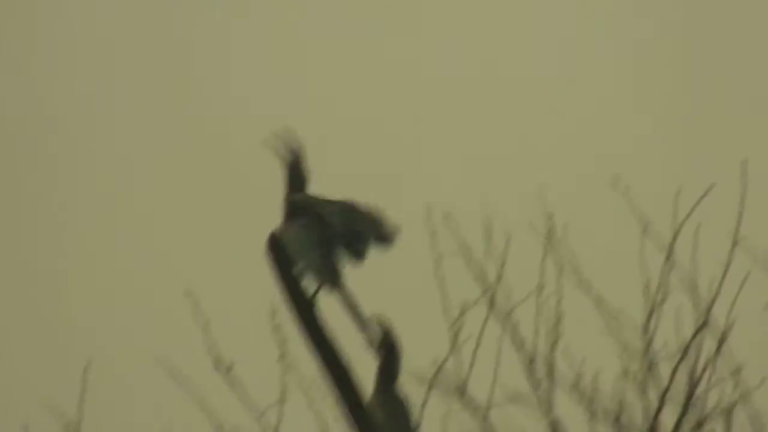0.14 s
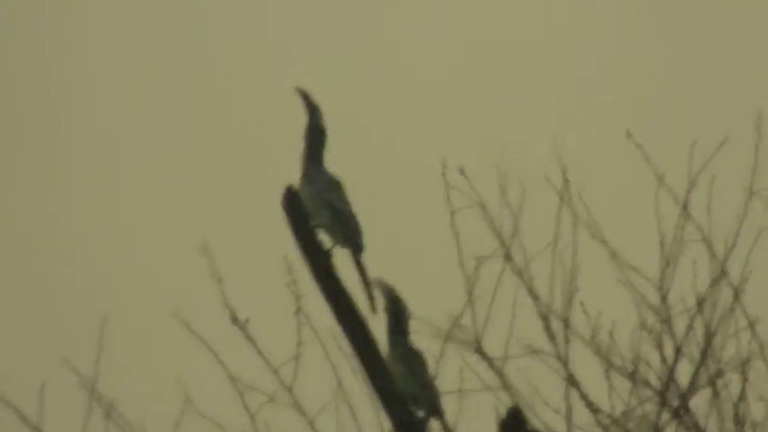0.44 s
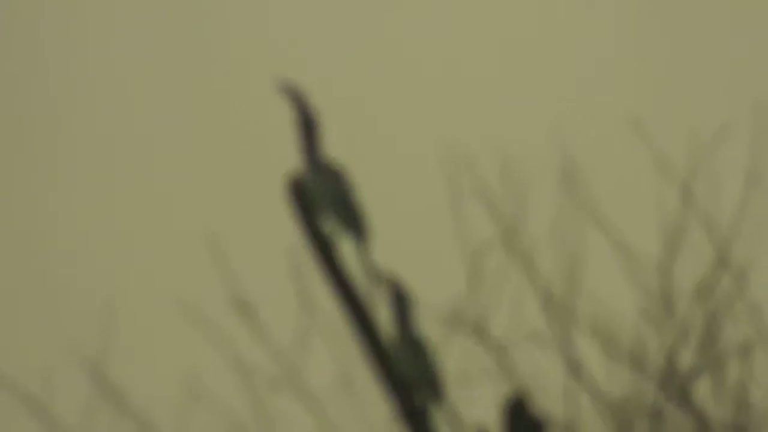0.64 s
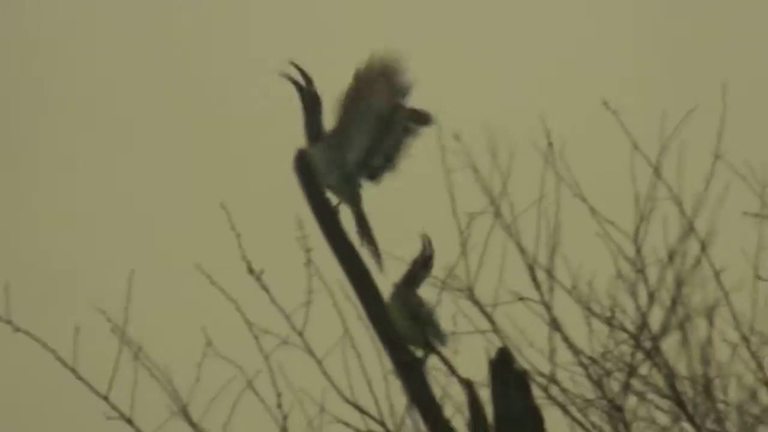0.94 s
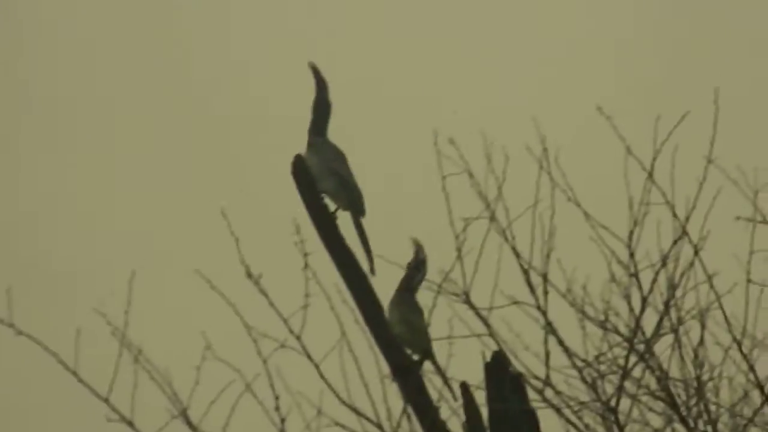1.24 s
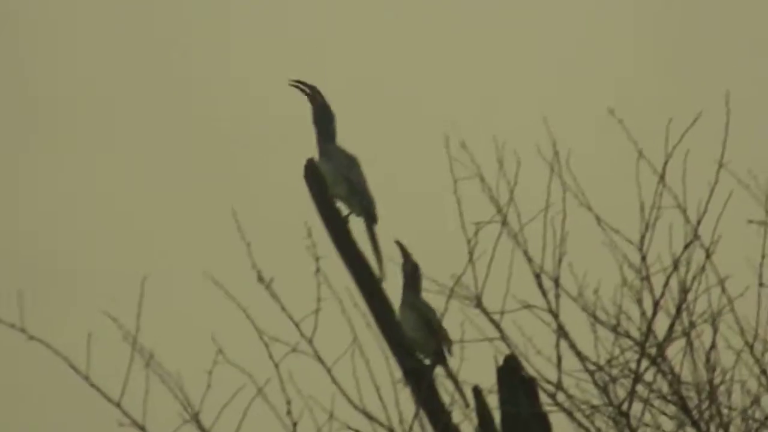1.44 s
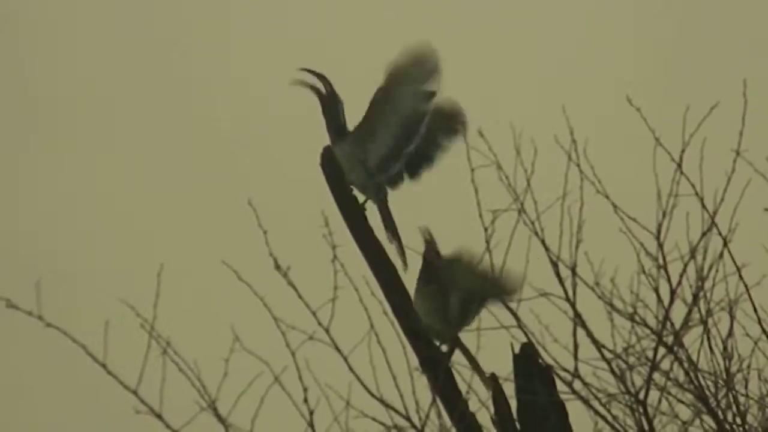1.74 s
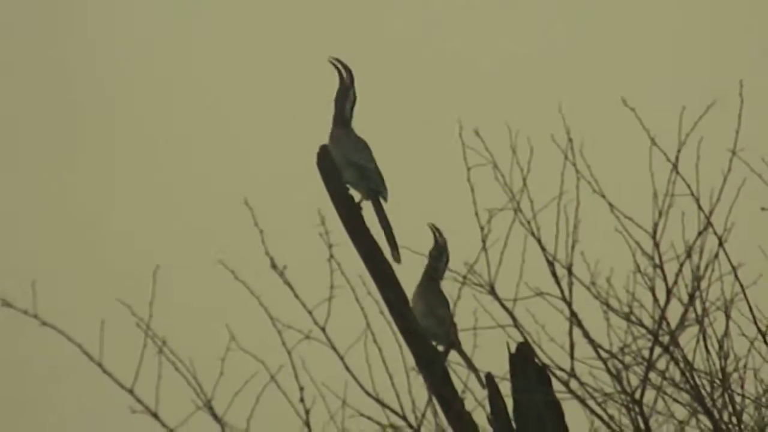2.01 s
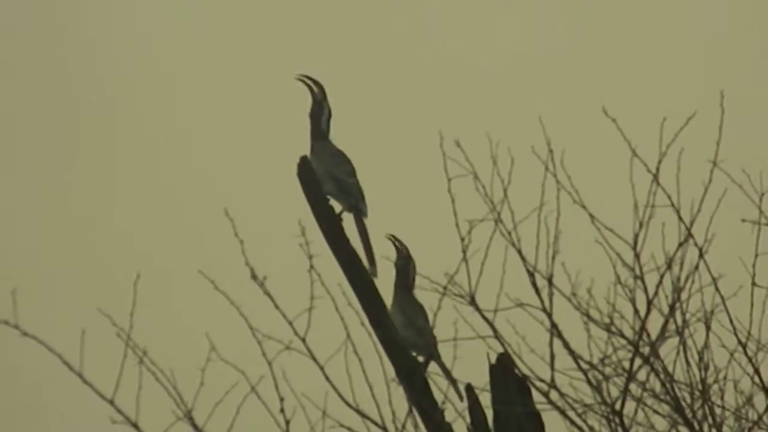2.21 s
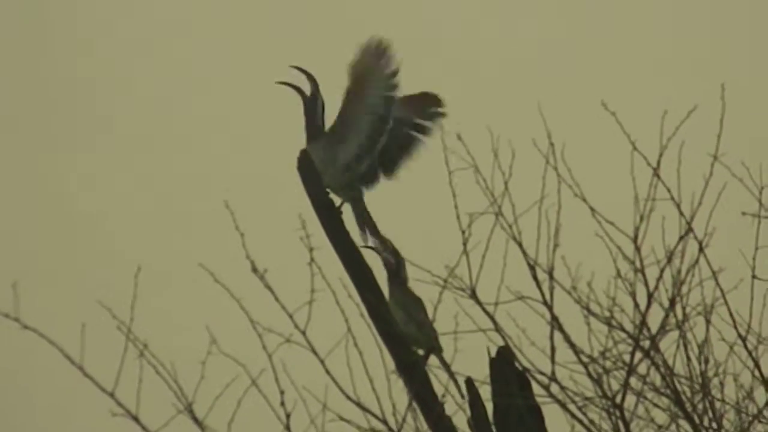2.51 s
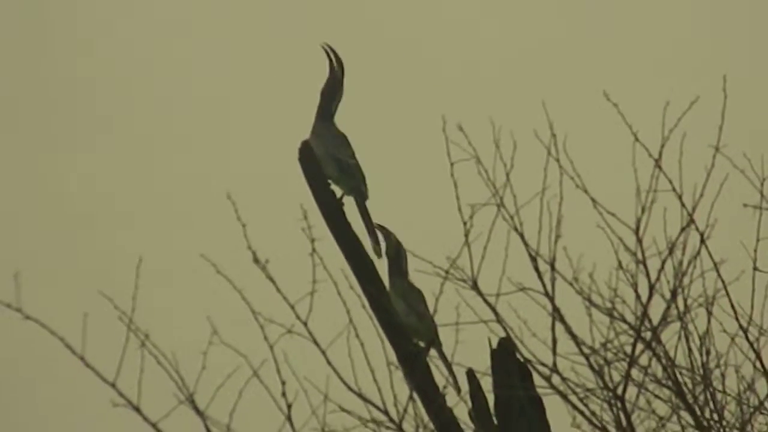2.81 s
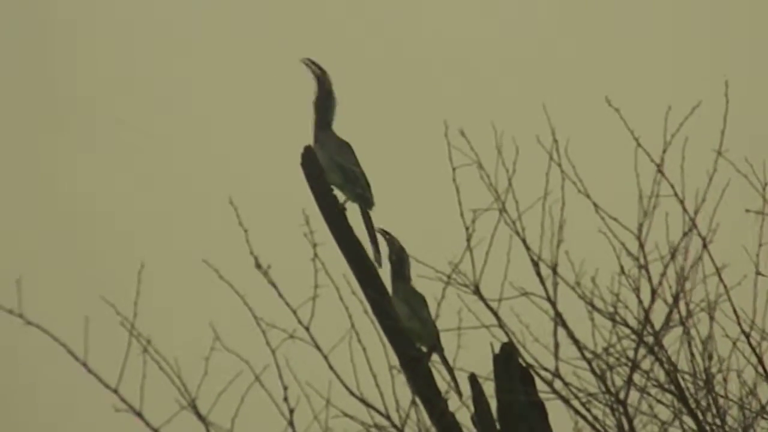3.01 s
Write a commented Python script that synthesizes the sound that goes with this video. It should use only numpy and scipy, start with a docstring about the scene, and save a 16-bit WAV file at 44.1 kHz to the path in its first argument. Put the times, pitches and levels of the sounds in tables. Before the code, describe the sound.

Hornbills pipe shrill, overlapping, drooping whistles from 0 to 3 s, in closely spaced bursts with light outdoor echoes. A raspy, chopped warble runs through the first 0.5 s, and higher small-bird peeps and tiny squeaks recur. Fingers rustle and tick on the camera until about 1.3 s. Low wind thumps touch the microphone near 1.2 s, then strengthen from 1.9 s over faint, distant hush.

```python
"""Hornbill whistles in gusting wind

Hornbills pipe overlapping whistles that glide and droop, smaller birds whistle higher, and one bird
rasps a short warble: all are harmonic tones with echoes. Fingers rustle and tick on the camera early on
(coloured noise, knocked resonances); wind thumps ever harder on the microphone over a far outdoor hush."""
import sys
import numpy as np
from scipy import signal
from scipy.fft import rfft, irfft, next_fast_len
from scipy.io import wavfile
from scipy.ndimage import uniform_filter1d, map_coordinates

SR = 44100
rng = np.random.default_rng(int(sys.argv[2]) if len(sys.argv) > 2 else 0)


def to_wav(sig):
    """Store sig (one row per channel, or 1-D mono) as 16-bit WAV at the path in sys.argv[1].

    Samples outside -1..1 are clipped; the rate is SR.
    """
    pcm = np.clip(np.atleast_2d(sig), -1, 1) * 32767
    pcm = np.round(pcm).astype(np.int16)
    wavfile.write(sys.argv[1], SR, pcm.T)  # frames by channels


N = 138915
ATTACK_S, RELEASE_S = 0.0069, 0.0069  # whistles and blends


def amp(db):
    """dB to amplitude ratio."""
    return 10 ** (np.asarray(db) / 20)


def unit(x):
    """Scales x to rms 1."""
    return x / np.sqrt(np.mean(x ** 2) + 1e-20)


def curve(rows):
    """Interpolates (time [s], level [dB]) to every sample, -120 dB after the last row."""
    s, v = np.transpose(rows)
    return np.interp(np.arange(N) / SR, s, v, right=-120)


def wobble(rate_hz):
    """A smooth random curve with rate_hz knots a second."""
    knots = rng.standard_normal(int(N * rate_hz / SR) + 4)
    return map_coordinates(knots, [np.arange(N) * rate_hz / SR])


def filtered(x, response):
    """Multiplies the spectrum of x by a response of frequency."""
    m = next_fast_len(N + SR // 2)
    return irfft(rfft(x, m) * response(np.fft.rfftfreq(m, 1 / SR)), m)[..., :N]


def rush(spectrum, patchy_db):
    """Coloured noise of rms 1 whose gain varies in random time-frequency patches."""
    z = signal.stft(rng.standard_normal(N), nperseg=512)[2]
    field = uniform_filter1d(rng.standard_normal(z.shape), size=6, axis=0)
    field = uniform_filter1d(field, size=8, axis=1)
    x = signal.istft(z * amp(patchy_db * unit(field)), nperseg=512)[1][:N]
    f, v = np.transpose(spectrum)
    return unit(filtered(x, lambda hz: amp(np.interp(np.log(hz + 1), np.log(f + 1), v))))


def add(out, s, x):
    """Mixes x into out from time s."""
    part = out[max(round(s * SR), 0):][:len(x)]
    part += x[:len(part)]


def edges(t, length, rise, fall):
    """Sine-squared attack and release."""
    return np.sin(np.pi / 2 * np.clip(np.minimum(t / rise, (length - t) / fall), 0, 1)) ** 2


def stretch(skip, count):
    """A slice of count samples starting at share skip of the first half, to vary each note."""
    start = int(skip * N / 2)
    return slice(start, start + count)


def whistles(notes, upper):
    """Each note glides to its settled pitch and droops as the breath runs out; overtones swell in late."""
    droop_s, bloom_s = 0.02213, 0.018
    waver_db, waver_hz, flicker_db = 2, 5.7, 3.5
    higher_db = -15.5  # offset of all upper partials, relative to the 2nd
    blur_rad = 0.25
    out = np.zeros(N)
    waver, drift, flicker = wobble(45.375), wobble(29.91), wobble(60.31)
    blur = blur_rad * wobble(150)
    for note, (start_turn, skip) in zip(notes, rng.random((len(notes), 2))):
        s, length, first, settled, glide, droop, db0, db1, over_db = note
        t = np.arange(round(length * SR)) / SR
        at = stretch(skip, len(t))
        hz = settled + (first - settled) * np.exp(-t / glide)
        hz = hz - droop * np.exp((t - length) / droop_s) + waver_hz * drift[at]
        phase = 2 * np.pi * (np.cumsum(hz) / SR + start_turn)
        overtones = np.sin(2 * phase + blur[at])
        for k, db in enumerate(upper):
            overtones += amp(higher_db + db) * np.sin((k + 3) * phase + blur[at])
        overtone_gain = amp(over_db + flicker_db * flicker[at]) * (1 - np.exp(-t / bloom_s))
        tone = np.sin(phase) + overtone_gain * overtones
        level = amp(db0 + (db1 - db0) * t / length + waver_db * waver[at])
        add(out, s, np.sqrt(2) * level * edges(t, length, ATTACK_S, RELEASE_S) * tone)
    return out


def hornbills():
    """Overlapping piped whistles, each a gliding harmonic tone."""
    # notes: (start [s], length [s], first pitch [Hz], settled pitch [Hz], glide time constant [s],
    # end droop [Hz], first level [dB], last level [dB], 2nd partial re fundamental [dB])
    pipes = [(0, 0.14, 2370, 2497, 0.026, 93, -36, -33.5, -21.5),
             (0, 0.069, 2440, 2395, 0.031, 190, -31.5, -37, -16),
             (.195, 0.11, 2390, 2470, 0.023, 133, -37, -36.5, -13),
             (.228, 0.24, 2590, 2276, 0.045, 104, -29.5, -33.5, -16.5),
             (.42, 0.077, 2258, 2164, 0.019, 92, -45, -35, -12),
             (.503, 0.126, 2570, 2428, 0.0503, 34, -34, -38.5, -27),
             (.6, 0.13, 2253, 2308, 0.018, 134, -33, -35.5, -10),
             (.74, .14, 2436, 2415, 0.049, 180, -35.5, -40, -16),
             (.915, 0.047, 2484, 2380, 0.031, 140, -46.5, -45, -11),
             (.945, 0.2, 2730, 2414, 0.044, 25, -37, -31, -22),
             (1.015, 0.24, 2600, 2265, 0.059, 160, -29, -37, -11),
             (1.29, .16, 2380, 2504, 0.036, 94, -45.5, -31, -17.5),
             (1.318, 0.051, 2443, 2453, 0.044, 5, -34.5, -40.5, -32),
             (1.385, 0.13, 2207, 2316, 0.032, 93, -35, -33, -10.5),
             (1.42, .21, 2861, 2481, 0.049, 148, -31.5, -38, -19.5),
             (1.74, 0.096, 2420, 2523, 0.027, 5, -41.5, -28.5, -16.5),
             (1.77, 0.069, 2484, 2293, 0.066, 260, -44, -40.5, -19),
             (1.775, 0.055, 2770, 2744, 0.031, 71, -55, -34.5, -24),
             (1.815, .22, 2638, 2409, 0.043, 125, -33.5, -37.5, -21.5),
             (1.8, 0.23, 2609, 2243, 0.069, 158, -29.5, -40, -14),
             (2.135, 0.18, 2843, 2446, 0.07, 96, -34.5, -35.5, -19),
             (2.135, 0.028, 2380, 2300, .02, 30, -48, -50, -14),
             (2.175, .13, 2220, 2289, .03, 150, -36.5, -38, -17),
             (2.18, 0.089, 2400, 2494, 0.03, 28, -40.5, -30, -30),
             (2.485, 0.16, 2322, 2370, 0.037, 46, -43.5, -39, -21.5),
             (2.513, 0.15, 2860, 2455, 0.071, 21, -33, -36, -24),
             (2.605, 0.23, 2577, 2252, 0.046, 168, -30, -35.5, -15),
             (2.61, 0.073, 2360, 2327, 0.039, 140, -35, -40, -24),
             (2.69, 0.12, 2593, 2423, 0.044, 110, -34, -34, -23),
             (2.81, 0.16, 2376, 2504, 0.02, 246, -36.5, -41, -18.5),
             (2.975, 0.13, 2207, 2292, 0.031, 90, -38, -34, -10.5),
             (2.985, 0.12, 2420, 2468, 0.023, 71, -36, -37.5, -25)]
    # 3rd to 6th partial before higher_db: (level [dB])
    pipe_upper = [-7, -16, -24, -26]
    return whistles(pipes, pipe_upper)


def warble():
    """A gliding tone chopped into uneven pulses, its pitch swinging in each, roughened by breath noise."""
    # syllables: (start [s], length [s], first pitch [Hz], last pitch [Hz], level [dB],
    # 2nd partial [dB], mean pulse rate [Hz])
    rasps = [(0, 0.017, 1880, 1787, -41.5, -3, 148), (0.02, 0.027, 2850, 3020, -43.5, -11, 210),
             (0.058, 0.04, 1995, 1783, -46, -4.5, 144), (0.101, 0.044, 2511, 3500, -39.5, -8, 107),
             (0.13, 0.026, 3516, 3580, -35, -8, 125), (0.178, 0.075, 2843, 2608, -41.5, -7.5, 170),
             (0.231, 0.078, 2100, 1480, -48, -2, 190), (.25, 0.072, 3580, 3130, -46, -6.5, 190),
             (0.318, 0.089, 1864, 1691, -47, -5, 110), (0.332, 0.083, 6800, 6300, -54, -34.5, 150),
             (0.33, 0.082, 3500, 3380, -54, -8, 170), (0.48, 0.035, 6460, 5290, -47, -27.5, 160),
             (0.394, .016, 3570, 3660, -33.5, -7.5, 120), (0.406, 0.087, 4388, 4080, -38.5, -25.5, 122),
             (0.197, 0.13, 5610, 5730, -49, -37, 220), (.37, 0.14, 5380, 4980, -48, -25.5, 140),
             (0.415, 0.1, 3370, 3697, -43, -9.5, 150), (0.427, 0.09, 2933, 1885, -40, -2.5, 140)]
    pulse_power, noise_gain, edge_s = 1.6, 0.25, 0.007
    chirp, wander_depth = 0.022, 0.022  # shares of pitch
    out = np.zeros(N)
    uneven, sizes, wander = wobble(40.06), wobble(118.6), wobble(260)
    for (s, length, first, last, db, over_db, rate), skip in zip(rasps, rng.random(len(rasps))):
        t = np.arange(round(length * SR)) / SR
        at = stretch(skip, len(t))
        beat = np.cumsum(rate * (1 + 0.144 * uneven[at])) / SR
        pulses = np.abs(np.sin(np.pi * beat)) ** pulse_power * amp(2.17 * sizes[at])
        hz = first + (last - first) * np.sin(np.pi / 2 * t / length)
        hz = hz * (1 - chirp * np.sin(2 * np.pi * beat) + wander_depth * wander[at])
        phase = 2 * np.pi * np.cumsum(hz) / SR
        a, b = uniform_filter1d(rng.standard_normal((2, len(t))), size=40)
        in_phase, quadrature = 1 + noise_gain * unit(a), noise_gain * unit(b)
        tone = np.zeros(len(t))
        for k, gain in [(1, 0.83), (2, amp(over_db))]:
            tone += gain * (in_phase * np.sin(k * phase) + quadrature * np.cos(k * phase))
        add(out, s, 2 * amp(db) * edges(t, length, edge_s, edge_s) * pulses * tone)
    return out


def trees(x):
    """Scattered echoes from the surrounding bush: convolution with decaying noise of unit energy."""
    t60_s, onset_s = 0.49, 0.0033
    t = np.arange(SR // 2) / SR
    tail = rng.standard_normal(len(t)) * amp(-60 * t / t60_s) * np.minimum(t / onset_s, 1)
    return signal.fftconvolve(x, tail / np.linalg.norm(tail))[:N]


def ticks():
    """Finger ticks: decaying noise knocks ring the case resonances, brighter noise cracks on top."""
    # ticks: (time [s], knock level before knock_db [dB], crack level before crack_db [dB])
    tick_rows = [(0.036, -39, -62), (0.104, -43, -61), (0.42, -39.5, -61.5), (0.431, -32, -53),
                 (0.436, -35, -33), (0.586, -38, -41.5), (0.883, -43, -53.5), (1.04, -44, -43),
                 (1.187, -47, -43)]
    # camera case resonances: (centre [Hz], width [Hz], level [dB])
    case_modes = [(323, 120, -2), (910, 390, 1.5), (1670, 170, -0.5)]
    knock_db, crack_db = 18.5, 7.5
    knock_t60_s, crack_t60_s, crack_top_hz = 0.018, 0.011, 9000
    knocks, cracks = np.zeros(N), np.zeros(N)
    t = np.arange(SR // 20) / SR
    for s, low_db, high_db in tick_rows:
        add(knocks, s, amp(low_db + knock_db - 60 * t / knock_t60_s) * rng.standard_normal(len(t)) / 2)
        add(cracks, s, amp(high_db + crack_db - 60 * t / crack_t60_s) * rng.standard_normal(len(t)))

    def case(f):
        """Sum of band-pass resonances of alternating sign."""
        return sum((-1) ** k * amp(db) * 1j * f * w / (c * c - f * f + 1j * f * w)
                   for k, (c, w, db) in enumerate(case_modes))

    def bright(f):
        """Rises with frequency, then falls steeply above crack_top_hz."""
        return f / 4000 / (1 + (f / crack_top_hz) ** 6)

    return filtered(knocks, case) + filtered(cracks, bright)


def rustle():
    """Fingers sliding on the camera case: grainy coloured noise under a level curve."""
    # sliding level before level_db: (time [s], level [dB])
    slide_levels = [(0, -55.5), (.12, -67.5), (.16, -90), (.21, -59.5), (.4, -64), (.45, -51.5),
                    (.57, -62.5), (.61, -55.5), (.63, -82), (.712, -72), (.725, -56), (.86, -61),
                    (.995, -60), (1.005, -72), (1.035, -60.5), (1.045, -56.5), (1.203, -57), (1.213, -72),
                    (1.28, -101)]
    # lower part of the slide spectrum: (frequency [Hz], density [dB per Hz])
    slide_low = [(500, -15.5), (1600, -3.5), (3300, 0)]
    # upper part of the slide spectrum: (frequency [Hz], density [dB per Hz])
    slide_high = [(3240, -35.5), (5500, -9), (6690, 2.5), (8110, -7), (9530, -6.5), (11300, -19),
                  (13300, -12.5), (15600, -33)]
    level_db, grain_db = 6.0, 1.3
    slide = rush([(200, -20.0)] + list(slide_low) + list(slide_high), patchy_db=2)
    return amp(curve(slide_levels) + level_db + grain_db * wobble(150)) * slide


def hush():
    """Far outdoor hush: steady, faintly patchy coloured noise."""
    # spectrum: (frequency [Hz], density [dB per Hz])
    hush_spectrum = [(25, -7), (80, -3), (200, -3), (400, -7), (1000, -13.5), (1800, -14.5), (3000, -16),
                     (5000, -22.5), (6500, -33), (7800, -23.5), (9000, -30.5), (15600, -33.5)]
    return amp(-58) * rush(hush_spectrum, patchy_db=2.5)


def small_birds():
    """Higher whistles and chips, made as gliding harmonic tones."""
    # notes: (start [s], length [s], first pitch [Hz], settled pitch [Hz], glide time constant [s],
    # end droop [Hz], first level [dB], last level [dB], 2nd partial re fundamental [dB])
    peeps = [(.152, 0.118, 3720, 3454, 0.08, 98, -47, -47, -14),
             (.555, 0.22, 3720, 3363, 0.057, 89, -47, -51.5, -13),
             (.615, 0.13, 3730, 3450, 0.067, 46, -42.5, -63, -13),
             (.91, 0.065, 3780, 3510, 0.032, 232, -50.5, -44.5, -15),
             (1.775, 0.047, 3620, 3410, 0.024, 102, -53, -42.5, -20),
             (.945, 0.18, 3796, 3450, 0.05, 70, -46.5, -49.5, -20),
             (1.418, 0.012, 3780, 3930, 0.021, 3, -38, -40.5, -20),
             (1.705, 0.03, 2680, 2720, 0.018, 16, -53, -51, -28),
             (1.71, 0.16, 3790, 3530, 0.038, 11, -42, -49.5, -15),
             (2.135, .21, 3900, 3180, 0.093, 63, -41.5, -51.5, -14.5),
             (2.688, 0.014, 3300, 3340, .02, 13, -59, -57.5, -16),
             (2.598, 0.013, 3540, 3460, .02, 15, -32.5, -50.5, -19),
             (2.79, 0.088, 2810, 2850, 0.017, 147, -59, -63, -29.5),
             (2.968, 0.36, 3440, 3150, 0.036, -140, -45.5, -43.5, -17)]
    # 3rd to 6th partial before higher_db: (level [dB])
    peep_upper = [3, -8, -16, -22]
    return whistles(peeps, peep_upper)


def wind():
    """Lumpy low noise buffeting plus single short thumps, a push and then a pull."""
    # buffeting level before buffet_db: (time [s], level [dB])
    strength = [(0, -81), (1, -86), (1.15, -52.5), (1.55, -61.5), (1.7, -55.5), (1.8, -57.5), (1.95, -33),
                (2.1, -60), (2.25, -35.5), (2.55, -36.5), (2.7, -33), (2.77, -39), (2.95, -31), (3.15, -35)]
    # buffeting spectrum: (frequency [Hz], density [dB per Hz])
    buffet_spectrum = [(9, -58), (15, -15.5), (44, 5.5), (98, -1), (159, -15), (266, -16.5), (450, -49),
                       (990, -120)]
    # thumps: (centre time [s], level before thump_db [dB], pitch [Hz])
    thumps = [(1.23, -39.5, 90), (1.254, -31.5, 90), (1.894, -30.5, 110), (1.905, -34.5, 100),
              (1.95, -37, 90), (2.227, -30.5, 85), (2.249, -26.5, 95), (2.277, -35, 120), (2.361, -35, 150),
              (2.372, -28, 191), (2.438, -32, 80), (2.473, -25, 115), (2.62, -25.5, 120), (2.638, -24, 100),
              (2.682, -32.5, 100), (2.711, -31.5, 130), (2.824, -22.5, 105), (2.914, -30.5, 140),
              (2.947, -24, 115), (2.977, -25.5, 125), (3.043, -32.5, 130), (3.08, -18.5, 75),
              (3.1, -31, 90)]
    buffet_db, lump_db, thump_db = -5.5, 2, -1
    narrowness = 2.27  # inverse width of a thump, in its own periods
    lumps = amp(lump_db * wobble(22.026))
    out = amp(curve(strength) + buffet_db) * unit(lumps * rush(buffet_spectrum, patchy_db=3.5))
    t = np.arange(-SR // 25, SR // 25) / SR
    for (s, db, hz), lean in zip(thumps, rng.standard_normal(len(thumps))):
        swing = np.sin(2 * np.pi * hz * t + 0.34 * lean)
        add(out, s + t[0], -amp(db + thump_db) * np.exp(-(narrowness * hz * t) ** 2) * swing)
    return out


def blends():
    """Short buzzy squeaks: a low and a high voice breed tones at low + high and 2 high - low."""
    # squeaks: (start [s], length [s], low voice [Hz], high voice [Hz], level [dB])
    squeaks = [(1.426, 0.016, 2770, 3760, -57), (1.71, 0.023, 2700, 3780, -57.5),
               (1.774, 0.05, 2680, 3630, -52.5), (2.141, .022, 2680, 3830, -50.5),
               (2.601, 0.011, 2610, 3500, -42), (2.695, 0.0092, 2650, 3250, -56.5)]
    sag_per_s, difference_db = 1.5, -5.5  # sag: share of pitch lost per second
    out = np.zeros(N)
    for s, length, low, high, db in squeaks:
        t = np.arange(round(length * SR)) / SR
        phase_per_hz = 2 * np.pi * (t - sag_per_s * t ** 2 / 2)
        tone = np.sin((low + high) * phase_per_hz)
        tone += amp(difference_db) * np.sin((2 * high - low) * phase_per_hz)
        add(out, s, amp(db) * edges(t, length, ATTACK_S, RELEASE_S) * tone)
    return out


def scene():
    """Birds with their echoes, fingers, wind and hush, summed to one channel."""
    birds = hornbills() + warble() + small_birds() + blends()
    echoes = amp(-9) * trees(birds)
    return (birds + echoes + ticks() + rustle() + hush() + wind())[None]


def record(dry):
    """The camera keeps nothing above its band limit."""
    top_hz = 15750
    return filtered(dry, lambda hz: hz < top_hz)


dry = scene()
out = record(dry)
to_wav(out)
```